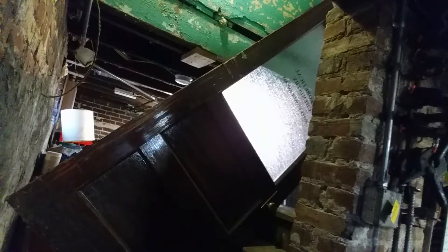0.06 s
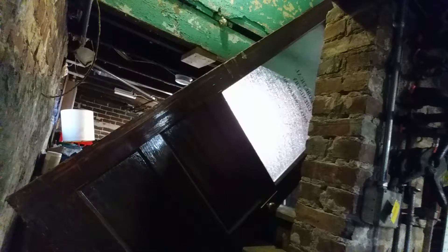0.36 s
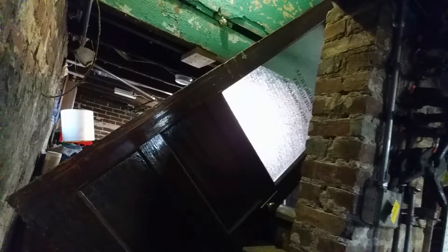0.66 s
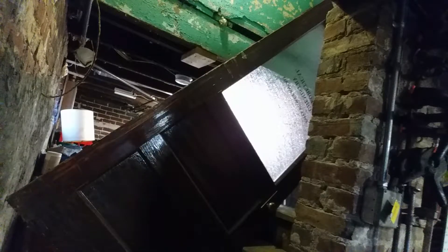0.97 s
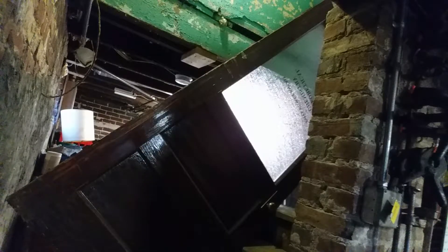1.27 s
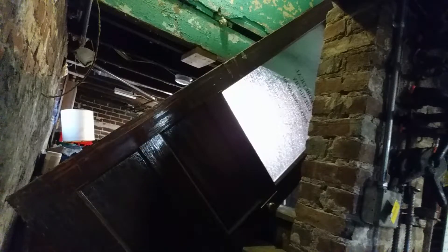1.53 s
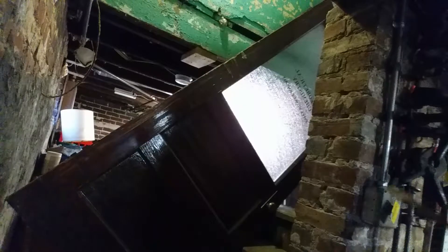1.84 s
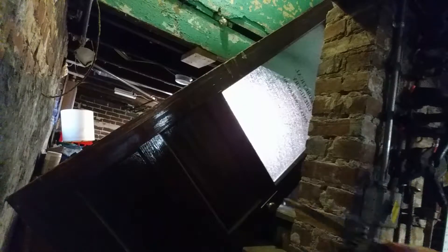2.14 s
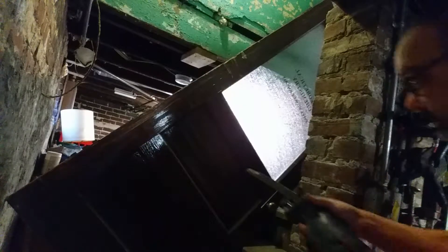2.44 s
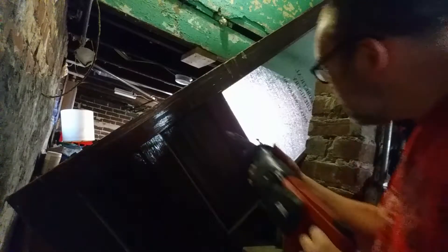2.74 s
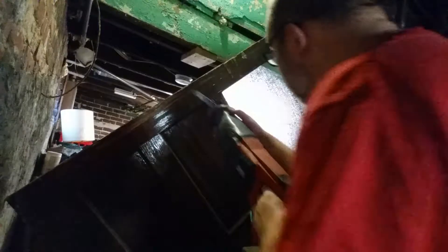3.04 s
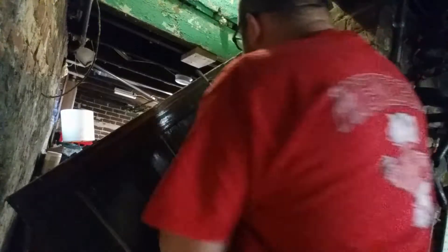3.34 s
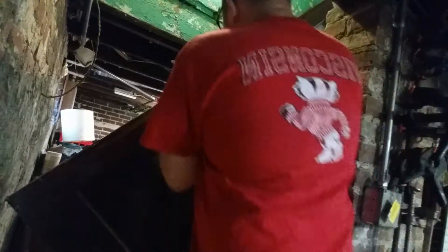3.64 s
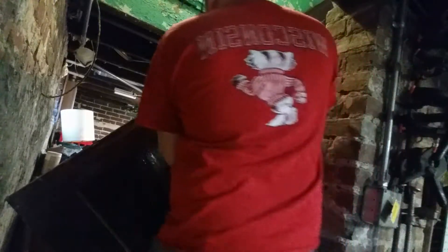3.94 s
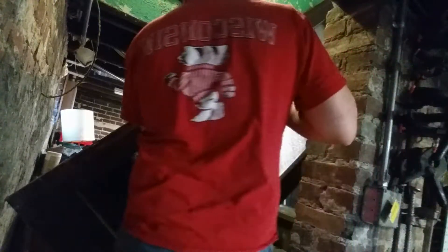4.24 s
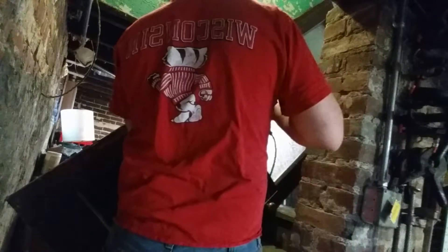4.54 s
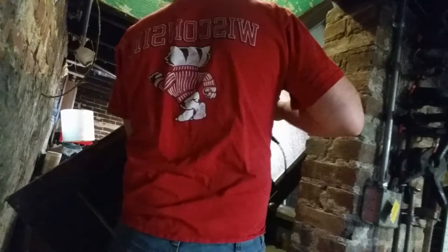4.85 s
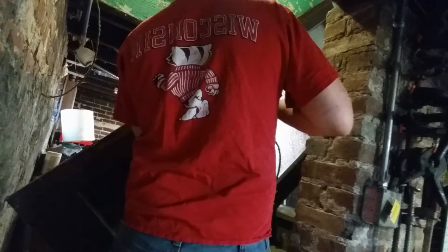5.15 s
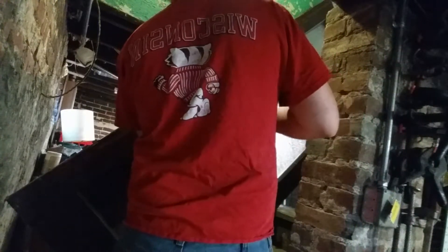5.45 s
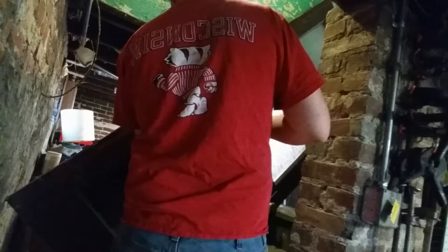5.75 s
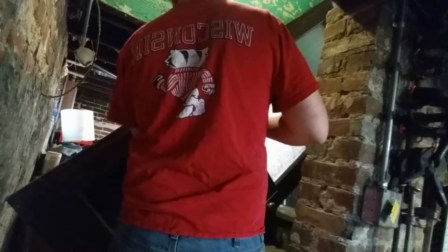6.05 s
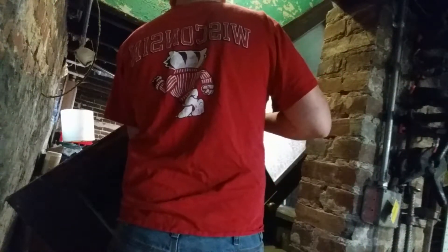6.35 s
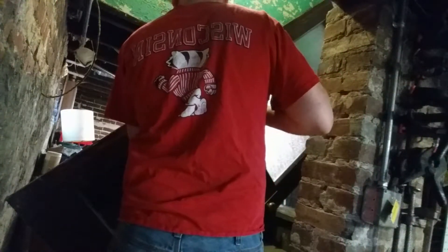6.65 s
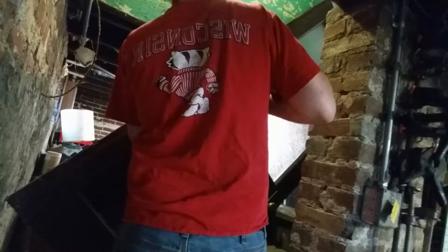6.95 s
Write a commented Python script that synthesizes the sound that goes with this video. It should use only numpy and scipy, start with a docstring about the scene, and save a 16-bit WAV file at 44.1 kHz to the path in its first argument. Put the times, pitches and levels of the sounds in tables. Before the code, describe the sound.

In a small brick cellar, boards knock together and dull thumps land while shoes shuffle over a gritty floor. A steel blade jingles briefly, wood scrapes, and a power tool clacks as it is handled. After a short hush, a reciprocating saw spins up and cuts into a wooden door, much louder, whining and clattering while the door drones and judders. The sound is fairly close, with a short room echo.

```python
"""Sawing a cellar door

In a brick cellar someone knocks about among boards, picks up a reciprocating saw and shuffles over
to an old wooden door. Each blow rings in the wood or the saw's body, and the steel blade jingles.
The saw is set against the door; after a short hush its motor spins up and the blade bites.
The strokes shake the whole door, which drones and judders under the clatter and whine of the tool."""
import sys
import numpy as np
from scipy import signal
from scipy.fft import rfft, irfft
from scipy.io import wavfile
from scipy.ndimage import uniform_filter1d

SR = 44100
rng = np.random.default_rng(int(sys.argv[2]) if len(sys.argv) > 2 else 0)


def unload_wav(signal):
    """Save mono or channel-first audio to the path in sys.argv[1] as 16-bit WAV at rate SR, clipped to [-1, 1]."""
    wavfile.write(
        sys.argv[1],
        SR,
        np.round(np.clip(np.atleast_2d(signal).T, -1, 1) * 32767).astype(np.int16),
    )


N = 308700
T = np.arange(N) / SR
HZ = np.fft.rfftfreq(N, 1 / SR)


def amp(db):
    """Decibels to gain."""
    return 10 ** (np.asarray(db) / 20)

def unit(x):
    """Scales each row to rms 1."""
    return x / np.sqrt(np.mean(x ** 2, axis=-1, keepdims=True) + 1e-20)

def noise(size=N):
    """White noise in two rows, mid and side."""
    return rng.standard_normal((2, size))

def wander(rate_hz):
    """Smooth random drift of rms 1."""
    return unit(irfft(rfft(rng.standard_normal(N)) * np.exp(-(HZ / rate_hz) ** 2), N))

def ease(middle_s, length_s):
    """A smooth step from 0 to 1."""
    return .5 + .5 * np.sin(np.pi * np.clip((T - middle_s) / length_s, -.5, .5))

def swell(middle_s, length_s):
    """One arch from 0 up to 1 and back."""
    return np.cos(np.pi * np.clip((T - middle_s) / length_s, -.5, .5))

def read_curve(points, hz):
    """Reads a curve on a log-frequency axis."""
    freqs, values = np.transpose(points)
    return np.interp(np.log(hz + 1), np.log(freqs + 1), values)

def colour(x, eq):
    """Shapes a sound with an EQ curve."""
    size = x.shape[-1]
    return irfft(rfft(x) * amp(read_curve(eq, np.fft.rfftfreq(size, 1 / SR))), size)

def add(mix, start_s, sound):
    """Lays a sound into the mix."""
    part = mix[:, max(round(start_s * SR), 0):][:, :sound.shape[-1]]
    part += sound[..., :part.shape[-1]]

def resonate(x, hz, width_hz):
    """A resonance of gain 1, steady or gliding."""
    carrier = np.exp(2j * np.pi * np.cumsum(hz * np.ones(x.shape[-1])) / SR)
    pole = np.exp(-np.pi * abs(width_hz) / SR)
    return 2 * (carrier * signal.lfilter([1 - pole], [1, -pole], x / carrier + 1e-18)).real

def ringing(x, modes):
    """A sound plus the modes that it excites."""
    return x + sum(amp(db) * resonate(x, hz, width) for hz, width, db in modes)

def boost(modes, gain_db):
    """The same modes, excited more or less strongly."""
    return [(hz, width, db + gain_db) for hz, width, db in modes]


# Still air: freq_hz, gain_db
AIR_EQ = [(15, -18), (25, 8.5), (49, 1), (122, -14), (331, -24.5), (537, -10.5), (945, -29), (1200, -19),
          (1900, -26.5), (2920, -21.5), (15500, -28)]
# Mains hum: pitch_hz, level_db
MAINS = [(119.8, -70), (180, -86)]

def room_tone(air_db=-72.5):
    """Faint air noise and mains hum."""
    hum = sum(amp(db) * np.sqrt(2) * np.sin(2 * np.pi * hz * T) for hz, db in MAINS)
    return amp(air_db) * unit(colour(noise(), AIR_EQ)) + hum


# Reverb decay: freq_hz, t60_s
CELLAR_DECAY = [(100, 0.33), (300, 0.47), (800, 0.23), (2500, 0.28), (6000, 0.15), (14000, 0.39)]

def cellar(x, wet_db, build_s=0.011):
    """Direct sound plus dense echoes off brick, each band dying at its own speed."""
    hz, t, bands = signal.stft(noise(SR // 2), SR, nperseg=256)
    decay = amp(-60 * t / read_curve(CELLAR_DECAY, hz)[:, None])
    tail = signal.istft(bands * decay * np.minimum(t / build_s, 1), SR, nperseg=256)[1]
    echoes = signal.fftconvolve(x, tail / np.linalg.norm(tail[0]), axes=1)[:, :N]
    return (x + amp(wet_db) * echoes) / np.hypot(1, amp(wet_db))


# Floor grit and bright rustle: freq_hz, gain_db
GRIT_EQ = [(200, -13.5), (400, 6), (750, 4.5), (1500, -2), (3000, -7.5), (4500, -25.5), (7000, -33)]
RUSTLE_EQ = [(2500, 1), (4500, 4), (6800, 0.5), (8500, -10.5), (13000, -7.5), (16000, -16.5)]
# How much the person moves about: time_s, level_db
BUSTLE = [(0.0, -62), (0.23, -59.5), (0.39, -51), (0.63, -52.5), (0.89, -63.5), (1.14, -53.5), (1.28, -56),
          (1.55, -62.5), (1.95, -55), (2.06, -60), (2.67, -53), (2.8, -54.5), (3.63, -48.5), (3.83, -52),
          (4.1, -41), (4.33, -56.5), (4.93, -67.5), (5.55, -71)]
# A sole twists on grit while clothes brush: middle_s, length_s, grit_db, cloth_db
SCUFFS = [(0.808, 0.123, -56, -75.5), (2.01, 0.107, -67, -64.5), (3.011, 0.25, -55, -90),
          (3.727, 0.252, -46, -74), (4.173, 0.37, -65, -52.5)]

def shuffling(pad_db=-4, grit_db=-7, cloth_db=-31, cloth_follows=0.69, grains_per_s=4000):
    """Soles pad and grind over grit while clothes rustle, until the motor starts."""
    bustle_db = np.interp(T, *np.transpose(BUSTLE))
    grit, cloth = amp(bustle_db + grit_db), amp(cloth_follows * bustle_db + cloth_db)
    for middle_s, length_s, twist_db, brush_db in SCUFFS:
        scuff = swell(middle_s, length_s) ** 2
        grit += amp(twist_db) * scuff
        cloth += amp(brush_db) * scuff
    grains = noise() * (rng.random(N) < grains_per_s / SR) * amp(2.5 * wander(20))
    pad_eq = [(25, -12), (70, 5), (190, 1.5), (330, -5.5), (600, -11.5), (2000, -67)]
    pads = amp(bustle_db + pad_db + 3.5 * wander(15)) * unit(colour(noise(), pad_eq))
    out = pads + grit * unit(colour(grains, GRIT_EQ)) + cloth * unit(colour(grains, RUSTLE_EQ))
    return out * (T < MOTOR_START_S)


# Wood and soles drag on the floor: start_s, length_s, level_db, from_hz, to_hz
SCRAPES = [(1.879, 0.062, -43.5, 840, 920), (2.845, 0.078, -47, 347, 510), (3.209, 0.078, -43, 192, 247),
           (3.228, 0.24, -41, 765, 730), (3.738, 0.097, -40.5, 606, 660)]

def scrapes(width_hz=140, rasp_db=-7, slip_db=-2, slip_hz=30, attack_s=0.014, release_s=0.051):
    """Uneven slips excite one broad, gliding resonance over a gritty rasp."""
    out, slips = np.zeros((2, N)), amp(slip_db * wander(slip_hz))
    for start_s, length_s, db, from_hz, to_hz in SCRAPES:
        t = np.arange(0, length_s, 1 / SR)
        rub = noise(len(t)) * np.interp(start_s + t, T, slips)
        hz = np.linspace(from_hz, to_hz, len(t))
        ring = unit(resonate(resonate(rub, hz, width_hz), hz, width_hz * 4))
        rasp = amp(rasp_db) * unit(colour(rub, GRIT_EQ))
        pressure = np.minimum(t / attack_s, 1) * np.minimum((length_s - t) / release_s, 1)
        add(out, start_s, amp(db) * pressure * unit(ring + rasp))
    return out


# Borders of a blow's five bands (thud, body, knock, crack, tick): edge_hz
BAND_EDGES = [55, 160, 500, 1400, 4500, 15500]
# How far a hard hit lifts each band: hardness_factor
HARDNESS_REACH = [0, 0, 0, 1, 1.5]
# Raw impact noise: freq_hz, gain_db
BLOW_EQ = [(50, 22.5), (110, 6), (300, -1), (900, -11), (2000, -0.5), (3500, -3), (6000, -15.5),
           (9000, -25), (15000, -33.5)]
# The work drifts from left to right: time_s, leftward_db
PAN = [(0.7, 2), (3.6, -2.5)]

def blow(start_s, bands_db, modes, t60_s, snap_s=0.009, bounce_s=0.018, bass_t60_s=0.21, rattle_db=3):
    """A blow snaps, bounces and rings in the struck piece, which rattles as it settles."""
    t, hit = np.arange(SR // 3) / SR, 0
    rattle = amp(rattle_db * unit(uniform_filter1d(rng.standard_normal(len(t)), size=300)))
    grain = colour(noise(len(t)), BLOW_EQ) * rattle
    contact = 0.23 * np.exp(-t / snap_s) + 0.143 * np.exp(-(2 * t / bounce_s - 2) ** 2)
    for k, (lo, hi, db) in enumerate(zip(BAND_EDGES, BAND_EDGES[1:], bands_db)):
        decay = amp(-60 * t / (bass_t60_s if k < 2 else t60_s))
        ring = ringing(grain * (decay + contact), [m for m in modes if lo < m[0] < hi])
        band = signal.sosfilt(signal.butter(3, (lo, hi), "band", fs=SR, output="sos"), ring)
        hit = hit + amp(db) * band / band[:, :SR // 25].std(axis=1, keepdims=True)
    leftward_db = np.interp(start_s, *np.transpose(PAN))
    hit[1] += np.tanh(leftward_db * np.log(10) / 40) * hit[0]
    return hit


# Resonances of the boards: pitch_hz, width_hz, gain_db
BOARD_MODES = [(85, 15, 10), (190, 16.6, -10), (267, 11, -6.5), (400.2, 26, -2), (662, 22, 0.5),
               (745, 44, 1.5), (900, 100, -3), (1070, 29, -13), (1680, 17, -13), (2120, 84, -11.5),
               (2690, 16.7, -16), (2980, 30, -18)]
# A dull landing, thud to tick: gain_db
THUMP_BANDS = [-2, 0, -12, -17.5, -28]
# Feet and heavy wood land on the floor: start_s, level_db, bass_db, ring_hz
THUMPS = [(0.246, -50, 2, 241), (0.401, -28, -26, 317), (0.54, -44, -3.5, 199), (0.647, -48, -6.5, 196),
          (0.701, -49.5, 1, 195), (1.103, -51.5, -2, 236), (1.259, -48, 1.5, 196),
          (1.522, -68.5, 13.5, 234), (2.055, -57, -12, 347), (2.64, -50, -3, 200), (2.757, -48, -9, 198),
          (2.999, -52.5, -12, 208), (3.51, -53, -19, 212), (4.078, -36, 5.5, 108), (4.575, -59.5, 0, 196)]

def thumps(wood_db=6, ring_db=5, ring_width_hz=40, t60_s=0.14):
    """Soft, heavy landings ring the boards, each with its own weight in the lowest band."""
    out = np.zeros((2, N))
    for start_s, db, bass_db, ring_hz in THUMPS:
        bands_db = db + np.array(THUMP_BANDS)
        bands_db[0] += bass_db
        modes = boost(BOARD_MODES, wood_db) + [(ring_hz, ring_width_hz, ring_db)]
        add(out, start_s, blow(start_s, bands_db, modes, t60_s))
    return out


# A woody knock, thud to tick: gain_db
KNOCK_BANDS = [-19.5, -8, 0.5, -6.5, -24]
# Boards knock together: start_s, level_db, hardness_db, ring_hz, t60_s
KNOCKS = [(0.4, -38, 5.5, 550, 0.044), (0.525, -46.5, 3.5, 716, 0.337), (0.746, -37, 5.5, 642, 0.19),
          (1.16, -34.5, -5, 827, 0.23), (1.349, -31.5, -1.5, 900, 0.29), (1.703, -29, -2, 627, 0.19),
          (2.295, -49, 0, 890, 0.28), (2.624, -40, -11, 980, 0.11), (3.354, -48.5, 8, 960, 0.093),
          (3.508, -56, -4, 700, 0.13), (3.861, -42, -14, 521, 0.086), (4.168, -40, 4.5, 1140, 0.16),
          (4.812, -67, -13.5, 1150, 0.091), (5.235, -70.5, 1.5, 625, 0.16)]

def knocks(wood_db=12, ring_db=14, ring_width_hz=40, clack_hz=1880, clack_db=7, clack_width_hz=120):
    """Wood on wood: the struck piece adds its rings to those of the boards; harder is brighter."""
    out = np.zeros((2, N))
    for start_s, db, hardness_db, ring_hz, t60_s in KNOCKS:
        bands_db = db + np.array(KNOCK_BANDS) + hardness_db * np.array(HARDNESS_REACH)
        piece = [(ring_hz, ring_width_hz, ring_db), (clack_hz, clack_width_hz, clack_db)]
        add(out, start_s, blow(start_s, bands_db, boost(BOARD_MODES, wood_db) + piece, t60_s))
    return out


# Resonances of the tapped saw body: pitch_hz, width_hz, gain_db
SHELL_MODES = [(669.8, 29, 14), (920, 23.5, 1), (2255, 47, -1), (2921, 20, 7), (3820, 22.4, -10),
               (4640, 22, 0), (5650, 180, 5.5), (7070, 81, 8)]
# A bright clack, thud to tick: gain_db
CLACK_BANDS = [-22.5, -4.5, 0.5, 3, -2.5]
# The saw is handled and set against the door: start_s, level_db, hardness_db, ring_hz, t60_s
CLACKS = [(0.746, -46, -8, 3200, 0.28), (0.946, -60, -1, 1750, 0.079), (1.226, -67.5, 8.5, 2770, 0.051),
          (1.782, -55.5, 2.5, 2860, 0.079), (2.065, -64, 5, 3525, 0.081), (2.723, -48.5, 0, 2400, 0.22),
          (3.059, -42, -7, 1650, 0.169), (3.6, -51.5, -4, 2770, 0.4), (3.655, -49.5, -0.5, 2220, 0.417),
          (3.732, -43.5, -6, 2070, 0.18), (3.885, -34.5, -4.5, 2610, 0.18), (4.21, -50, -3.5, 2340, 0.064),
          (4.322, -75, 12.5, 3950, 0.16), (4.47, -76.5, 11, 4580, 0.28), (4.971, -96.5, 18.5, 6160, 0.09)]

def saw_clacks(ring_db=9, ring_width_hz=60, firm_db=-40, ring_follows=0.42):
    """Bright taps in the saw's body: firm ones ring, light ones stay dry."""
    out = np.zeros((2, N))
    for start_s, db, hardness_db, ring_hz, t60_s in CLACKS:
        bands_db = db + np.array(CLACK_BANDS) + hardness_db * np.array(HARDNESS_REACH)
        modes = boost([*SHELL_MODES, (ring_hz, ring_width_hz, ring_db)], ring_follows * (db - firm_db))
        add(out, start_s, blow(start_s, bands_db, modes, t60_s))
    return out


# Partials of the steel blade: pitch_hz, gain_db, t60_s
BLADE_MODES = [(3580, -10, 0.069), (4020, -22, .1), (4740, -4, 0.064), (5700, -10, 0.058), (5750, -6, 0.04),
               (7017, -10, 0.12), (7900, -26, 0.069), (8400, -17, 0.107), (10100, -13, 0.069),
               (12300, -24, .08)]
# One quick jingle: start_s, level_db
CLINKS = [(2.376, -36.5), (2.387, -37), (2.398, -28), (2.405, -34), (2.417, -54)]

def blade_clinks(rasp_db=-10, rasp_t60_s=0.173):
    """The blade chatters, each contact a steely ring with a short rasp."""
    t, out = np.arange(SR // 3) / SR, np.zeros((2, N))
    for start_s, level_db in CLINKS:
        ring = sum(amp(db - 60 * t / t60_s) * np.sin(2 * np.pi * (hz * t + rng.random((2, 1))))
                   for hz, db, t60_s in BLADE_MODES)
        rasp = unit(colour(noise(len(t)), RUSTLE_EQ)) * amp(rasp_db - 60 * t / rasp_t60_s)
        add(out, start_s, amp(level_db) * (.5 * ring + rasp))
    return out


MOTOR_START_S, FREE_SPEED_HZ, TURNS_PER_STROKE = 5.613, 349.5, 37 / 4
# Stages of the cut: middle_s, length_s
TOUCH = (5.692, 0.011)  # the teeth meet the door
PRESS = (6.094, 0.167)  # the saw is leaned on
BITE = (6.345, 0.18)  # the blade sinks in and drives the door evenly
LOOSE = (6.74, 0.14)  # the door starts to bounce as a whole

def fader(db, press_db=0, bite_db=0, loose_db=0):
    """Gain of one layer: its opening level, then a step up or down at each stage."""
    return amp(db + press_db * ease(*PRESS) + bite_db * ease(*BITE) + loose_db * ease(*LOOSE))

def clatter(strokes, eq, modes, rough, depth, wet_db):
    """Parts strike at both ends of each stroke: the rough share is chance, the rest repeats exactly."""
    cycle, size = strokes % 1, 1200
    strikes = np.exp(-cycle / 0.48) + 0.46 * np.exp(-((cycle + .5) % 1) / 0.09)
    pulse = 1 - depth + depth * 3 * strikes
    patterns = unit(irfft(np.exp(2j * np.pi * rng.random((2, size // 2 + 1)))))
    repeated = np.array([np.interp(cycle * size, np.arange(size), p) for p in patterns])
    drive = np.sqrt(1 - rough) * repeated + np.sqrt(rough) * noise()
    sound = colour(ringing(cellar(drive * pulse, wet_db), modes), eq)
    return sound / sound[:, round(PRESS[0] * SR):].std(axis=1, keepdims=True)

def stroke_tones(strokes, harmonics, waver_hz, waver_db=1.5):
    """Wavering sines on multiples of the stroke rate, of rms 1 at full speed."""
    tones = sum(amp(db + waver_db * wander(waver_hz)) * np.sin(2 * np.pi * (k * strokes + rng.random()))
                for k, db in harmonics)
    return tones / tones[round(PRESS[0] * SR):].std()


# Motor tones: shaft_multiple, gain_db
WHINE_TONES = [(3, -44), (5, -38), (10, -41), (12, -44), (17, -49), (23, -47), (35, -63)]

def motor_whine(turns, pace, waver_db=3):
    """Each stroke brakes the shaft a little and gear play jostles it, which roughens the motor's tones."""
    shaft = turns + .007 * wander(70) + .009 * np.sin(2 * np.pi * turns / TURNS_PER_STROKE)
    tones = sum(amp(db + waver_db * wander(40)) * np.sin(2 * np.pi * (k * shaft + rng.random((2, 1))))
                for k, db in WHINE_TONES)
    tones = ringing(tones, [(10100, 350, 13)])  # a tone swells as it glides through the blade's ring
    return fader(7.5, press_db=-5, bite_db=-3.5) * np.sqrt(pace) * tones


# Gear rasp and fan hiss: freq_hz, gain_db
GEARBOX_EQ = [(700, -41), (1300, 5), (1550, 1.5), (1730, 7.5), (1850, 0.5), (1990, 3.5), (2550, -1),
              (3100, -6), (3800, -6), (4500, -14), (6500, -40)]
FAN_EQ = [(2500, -30), (4500, 0), (5400, -2.5), (6200, -5.5), (7500, -9.5), (8700, -14), (11500, -15.5),
          (13000, -21.5), (16000, -26)]
# Resonances of the housing: pitch_hz, width_hz, gain_db
HOUSING_MODES = [(1720, 23, -7), (1940, 43, 0), (3060, 160, 0), (3200, 180, 0)]

def gearbox_and_fan(strokes, pace, gear_slow_db=-9, fan_slow_db=-10, idle_db=-4, catch_db=6):
    """Both grow with speed, flare as the teeth first catch, and are damped once the blade is buried."""
    touching = ease(*TOUCH)
    flare = np.exp(-np.maximum(T - TOUCH[0], 0) / 0.015)
    catch = amp(idle_db * (1 - touching) + catch_db * touching * flare)
    gear = clatter(strokes, GEARBOX_EQ, HOUSING_MODES, rough=0.83, depth=0.044, wet_db=-5)
    gear *= fader(-19, press_db=-1, bite_db=-3.5)
    fan = clatter(strokes, FAN_EQ, [], rough=0.93, depth=0.042, wet_db=-10)
    fan *= fader(-29.5, press_db=-1, bite_db=-4)
    return catch * (gear * amp(gear_slow_db * (1 - pace)) + fan * amp(fan_slow_db * (1 - pace)))


# The door's drone, and its deep rocking as a whole: stroke_multiple, gain_db
DRONE_TONES = [(5, 3), (6, 1), (7, -2), (8, 1), (9, -12), (10, -1), (11, 0), (12, -13), (13, -2), (16, -8),
               (17, -10), (24, -7), (25, -12)]
ROCKING_TONES = [(1, -14), (2, -0.5), (3, 0), (4, -10)]
# Low judder, panel rattle and the midrange of the cut: freq_hz, gain_db
JUDDER_EQ = [(25, -36), (38, -20), (55, -22), (75, 1), (115, 3.5), (155, -3), (230, -22), (400, -70)]
PANEL_EQ = [(90, -29), (170, -8), (300, -2.5), (460, 0), (600, -12), (1000, -65)]
CUT_EQ = [(300, -19), (500, -0.5), (610, 2), (710, 0), (800, -1), (900, -1), (1200, -3.5), (1500, -21),
          (2500, -59)]
# Sharp resonances of the panel and the cut: pitch_hz, width_hz, gain_db
PANEL_MODES = [(324.2, 8.3, -2), (390, 28, -6)]
CUT_MODES = [(606, 50, -6), (790, 30, -1), (885, 30, -3), (1103, 30, -3)]
# The saw bucks against the door: middle_s, length_s, jolt_db, rattle_db
KICKS = [(5.714, 0.06, 10, 2.5), (5.776, 0.09, 14, 11.5), (6.266, 0.044, -2, 6), (6.813, 0.1, 1.5, 7)]

def door(strokes, pace, idle_db=-17, cut_follows=0.19, cut_slow_db=-3):
    """The blade rattles the door, drones in it while it grips, then makes it judder; kicks jolt it."""
    contact = amp(idle_db * (1 - ease(*TOUCH)))
    jolt = amp(sum(db * swell(middle_s, length_s) for middle_s, length_s, db, _ in KICKS))
    rattle_db = sum(db * swell(middle_s, length_s) for middle_s, length_s, _, db in KICKS)
    drone = stroke_tones(strokes, DRONE_TONES, waver_hz=5)
    drone *= fader(-43, press_db=16.5, bite_db=11, loose_db=-8.5)
    rocking = stroke_tones(strokes, ROCKING_TONES, waver_hz=9.6) * pace ** 2
    rocking *= fader(-29.5, press_db=2, bite_db=0.5, loose_db=10.5)
    judder = clatter(strokes, JUDDER_EQ, [], rough=0.98, depth=0.28, wet_db=-6.5)
    judder *= fader(-28.5, press_db=2.5, bite_db=-4, loose_db=12)
    panel = clatter(strokes, PANEL_EQ, PANEL_MODES, rough=0.92, depth=0.6, wet_db=-4.5)
    panel *= fader(-27.5, press_db=4.5, bite_db=-1.5, loose_db=3)
    cut = clatter(strokes, CUT_EQ, CUT_MODES, rough=0.93, depth=0.093, wet_db=-8.5)
    cut *= fader(-23, press_db=3.5, bite_db=-1.95, loose_db=-0.3)
    mid_side = np.array([[1], [.3]])
    shaking = (drone + rocking * jolt) * mid_side + judder * jolt + panel * amp(rattle_db)
    return contact * shaking + cut * amp(cut_follows * rattle_db + cut_slow_db * (1 - pace))

def saw(spin_up_s=0.16, sag_hz=4.6, sag_hz_per_s=10):
    """The motor runs up, sags at the bite and slows as the cut deepens; its gear drives the blade."""
    run_up = 1 - np.exp(-(np.maximum(T - MOTOR_START_S, 0) / spin_up_s) ** 1.2)
    speed_hz = FREE_SPEED_HZ * run_up - sag_hz * ease(*BITE) - sag_hz_per_s * np.maximum(T - BITE[0], 0)
    turns = np.cumsum(speed_hz * (1 + .0012 * wander(35))) / SR
    strokes, pace = turns / TURNS_PER_STROKE, speed_hz / FREE_SPEED_HZ
    out = motor_whine(turns, pace) + gearbox_and_fan(strokes, pace) + door(strokes, pace)
    return out * np.clip((T - MOTOR_START_S) / .006, 0, 1)


# Stereo width: freq_hz, side_gain_db
WIDTH_EQ = [(60, -18.5), (250, -13), (450, -11), (750, -3.5), (1300, 1.5), (2800, 1.5), (5500, .5),
            (12000, 0)]

def scene():
    """Mixes in mid and side, then to left and right: narrow in the bass, wide in the treble."""
    handling = knocks() + saw_clacks() + thumps() + blade_clinks() + scrapes()
    mid, side = cellar(handling, wet_db=-8.5) + cellar(shuffling(), wet_db=-4) + room_tone() + saw()
    side = colour(side, WIDTH_EQ) + colour(mid, [(60, -20), (150, -15.5), (300, -53)])  # bass leans left
    return np.array([mid + side, mid - side])

def record(dry, ceiling=0.9, cutoff_hz=15950):
    """Rounds off the highest peaks, then trims the extreme treble."""
    rounded = dry / (1 + (dry / ceiling) ** 8) ** (1 / 8)
    lowpass = signal.firwin(511, cutoff_hz, window=("kaiser", 9), fs=SR)
    return signal.oaconvolve(rounded, lowpass[None], "same")


dry = scene()
out = record(dry)
unload_wav(out)
```